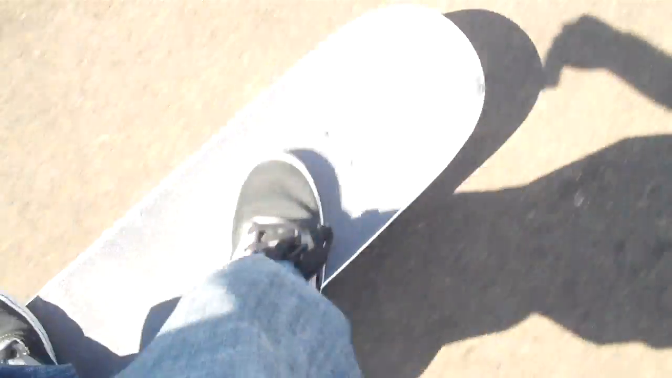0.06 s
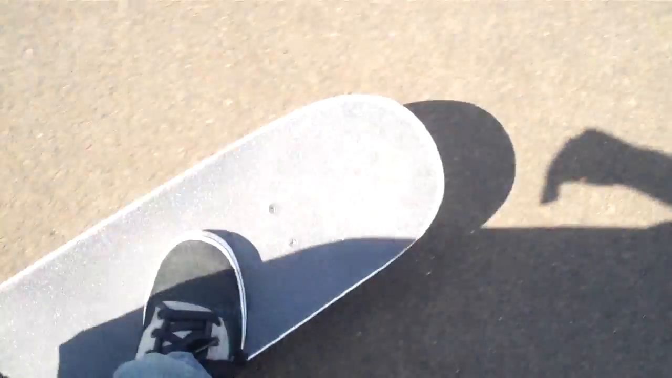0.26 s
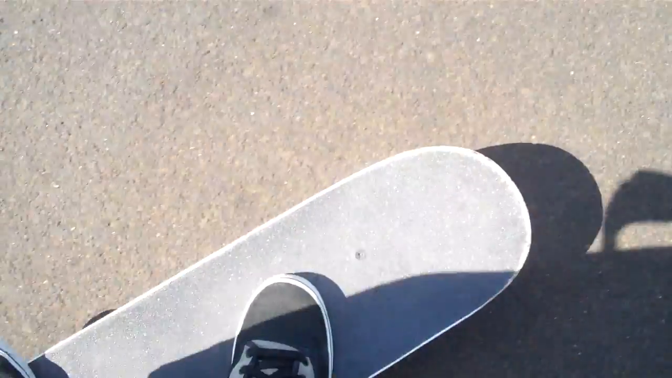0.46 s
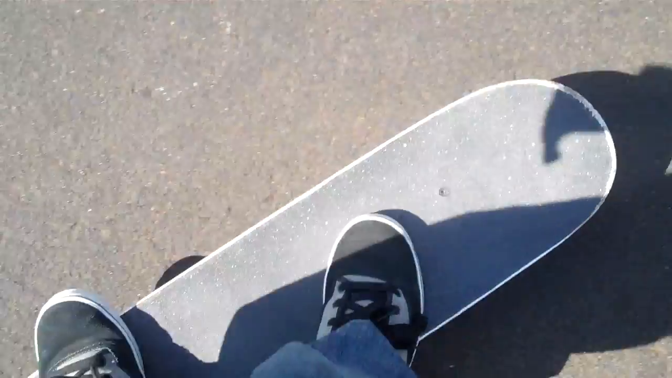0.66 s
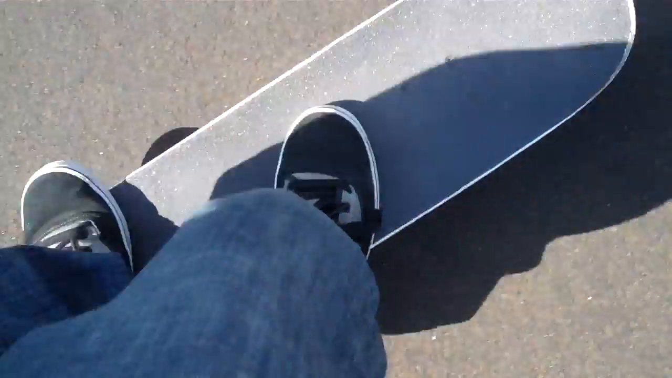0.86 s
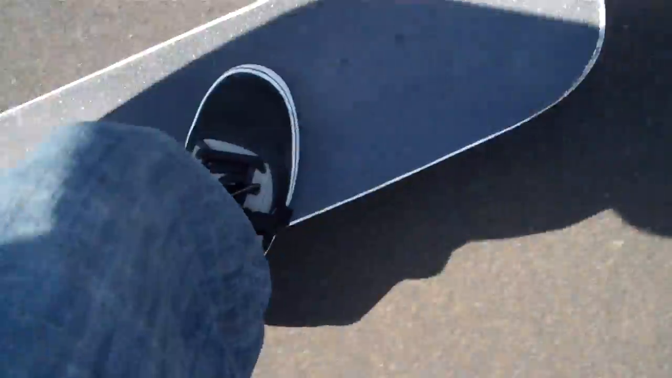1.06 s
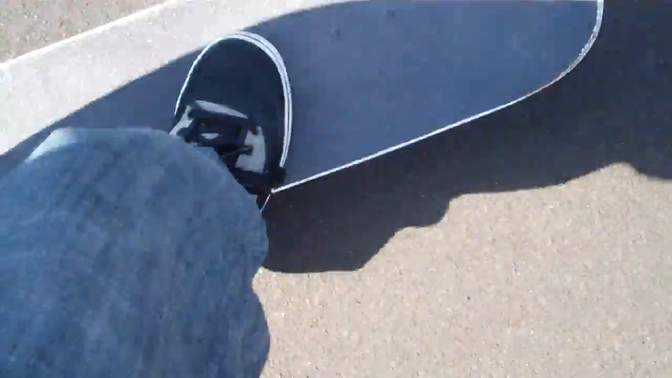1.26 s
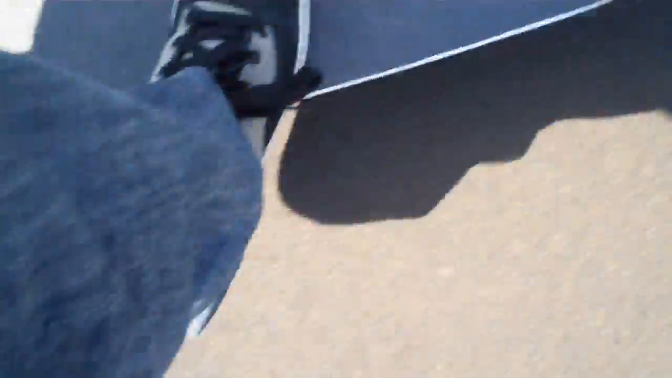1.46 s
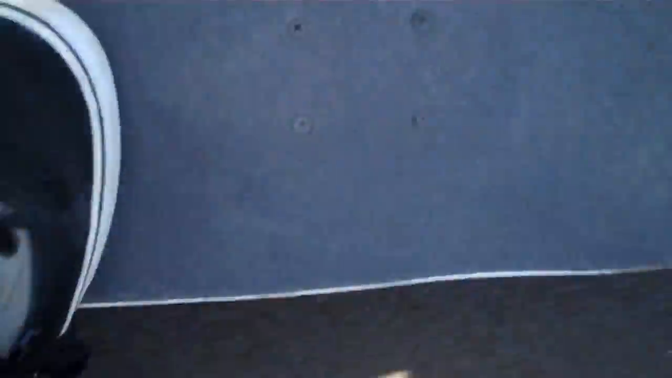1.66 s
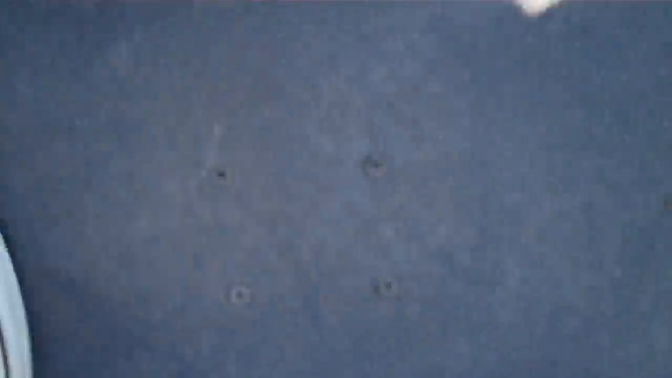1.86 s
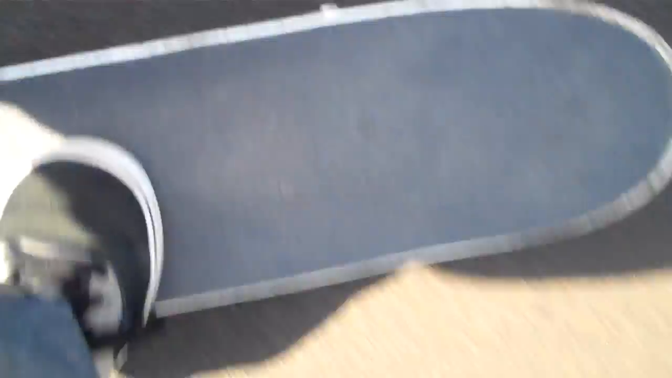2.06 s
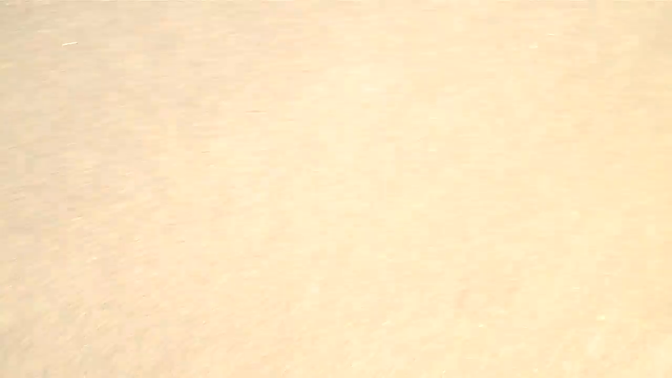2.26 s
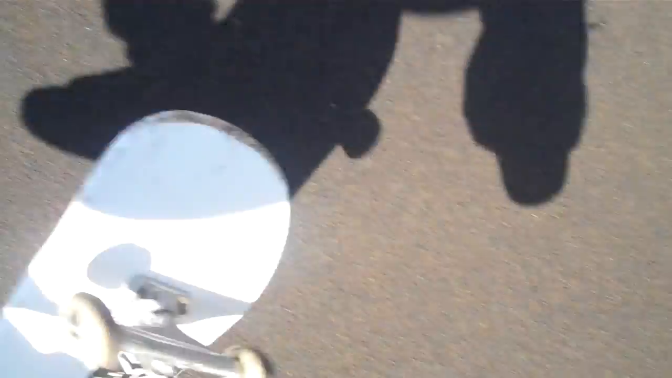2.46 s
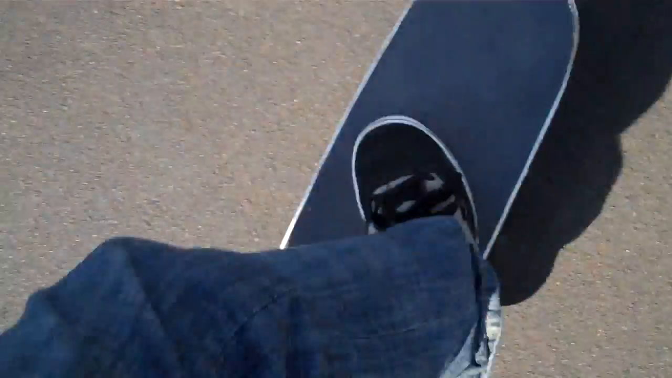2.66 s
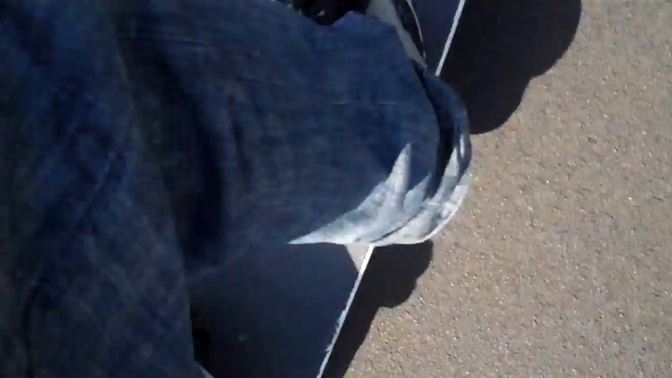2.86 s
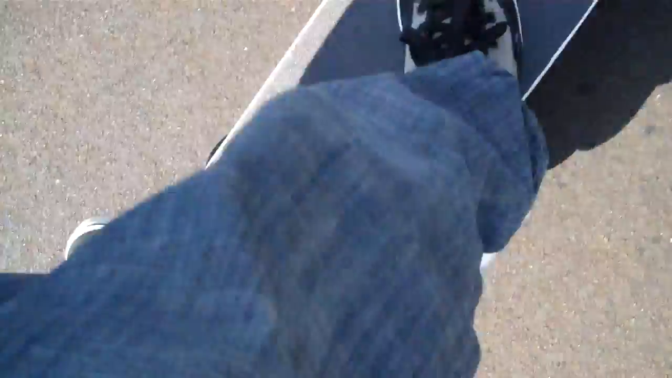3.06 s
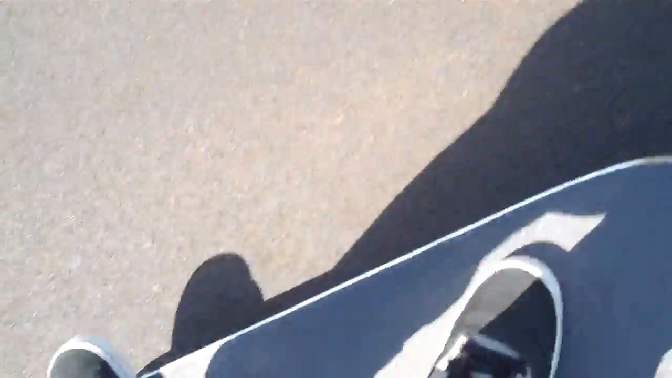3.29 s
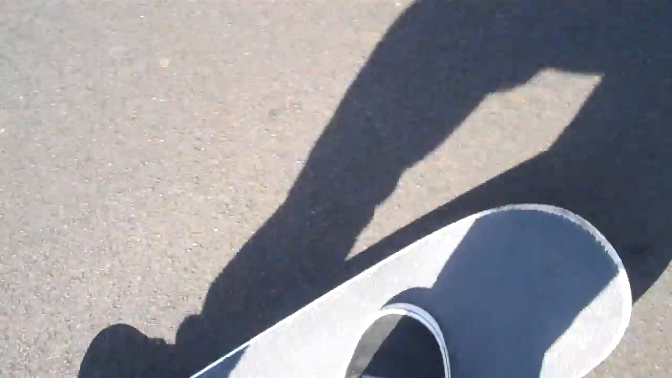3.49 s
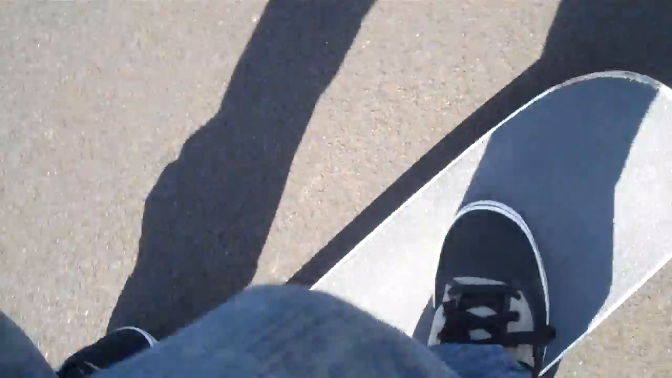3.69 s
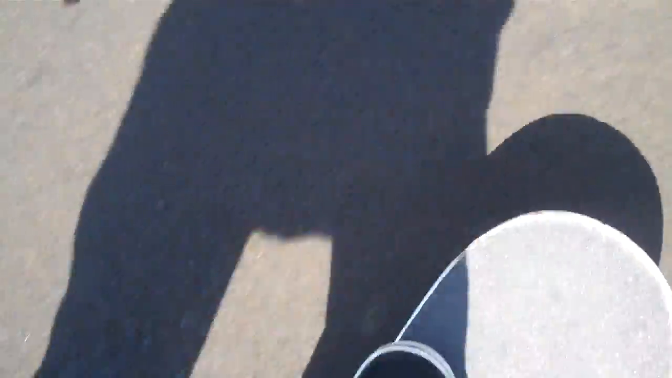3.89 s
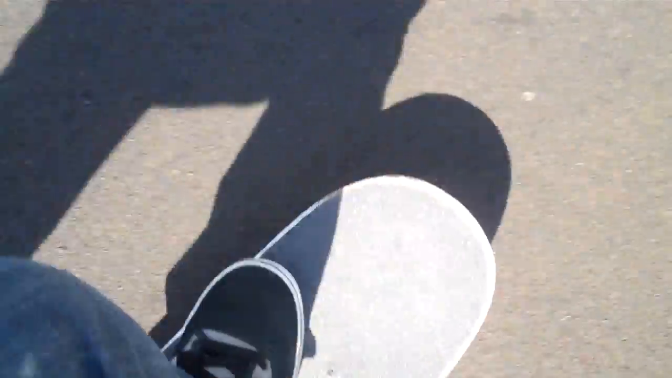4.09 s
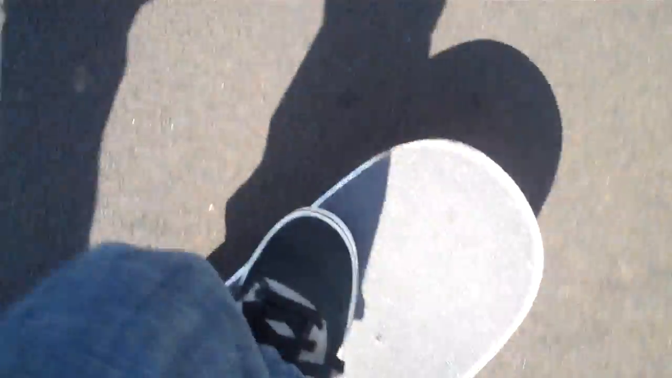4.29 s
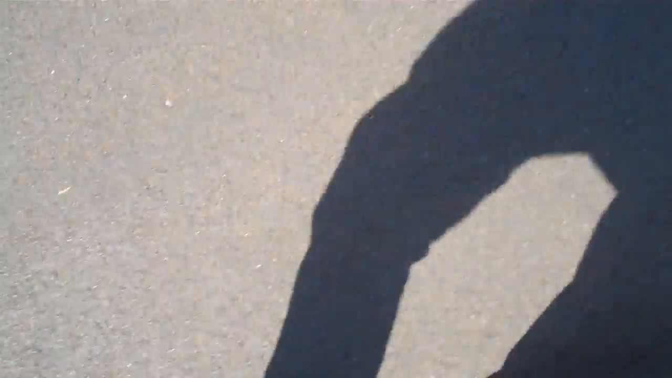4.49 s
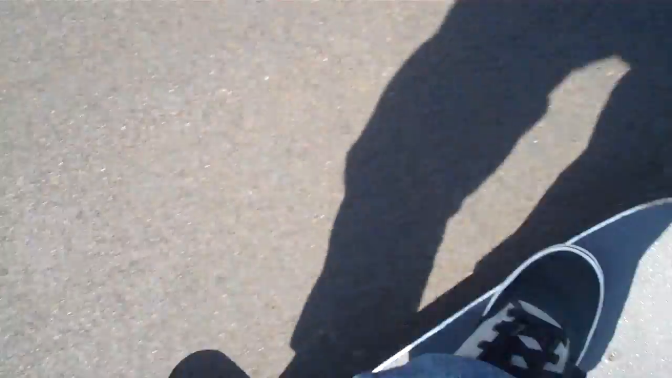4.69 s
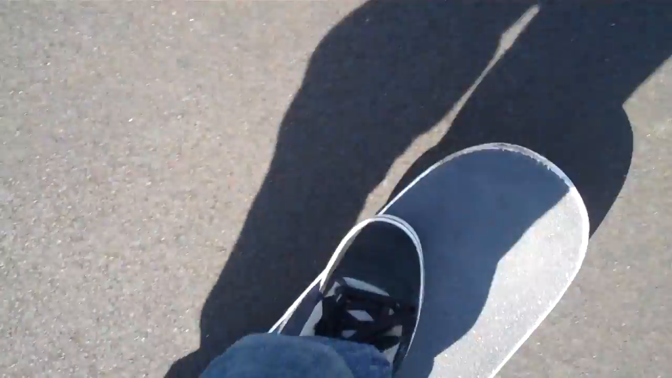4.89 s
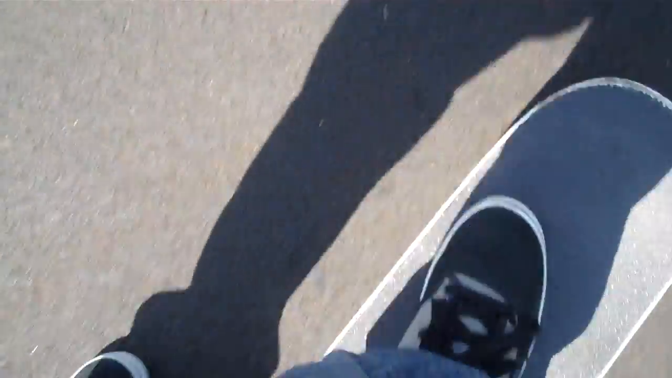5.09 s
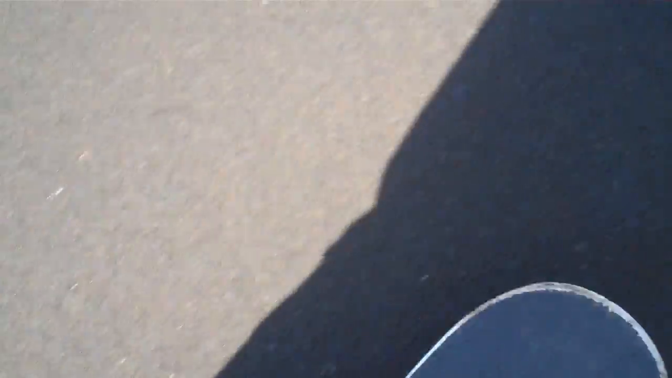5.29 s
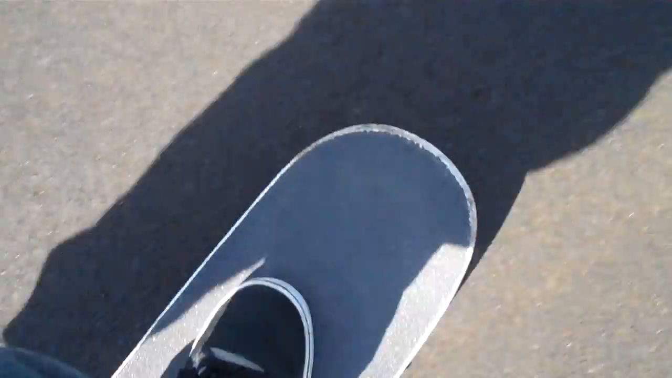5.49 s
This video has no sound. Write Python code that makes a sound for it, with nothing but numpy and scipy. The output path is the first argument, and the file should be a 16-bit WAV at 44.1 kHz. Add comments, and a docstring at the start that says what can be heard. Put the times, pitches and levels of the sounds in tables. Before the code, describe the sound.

A skateboard rumbles loudly over rough asphalt, pops into a jump, slams down with overloading wooden clacks, then rolls on with another sharp tap.

```python
"""A skateboard rolls over rough asphalt, heard in stereo from the rider's hand: stones jolt wheels and deck,
the trucks chatter, grit crunches and turning wheels rasp, as random impacts ringing resonant bodies.
A push-off thud, then the tail pops and a shoe drags over the grip tape, a burst of coloured noise.
In the air the wheels whir faintly; the board slams down, decaying deck modes that overload the microphone.
The front wheels tap down, the board rolls on, and after a turn they tap down again."""
import sys
import numpy as np
from scipy import signal
from scipy.fft import rfft, irfft, next_fast_len
from scipy.io import wavfile
from scipy.ndimage import uniform_filter1d, map_coordinates

SR = 44100
rng = np.random.default_rng(int(sys.argv[2]) if len(sys.argv) > 2 else 0)


def waveform_to_disk(signal):
    """Save audio, clipped to [-1, 1], as 16-bit WAV at the path in sys.argv[1]."""
    frames = np.transpose(np.atleast_2d(signal))
    scaled = np.clip(frames, -1, 1) * 32767
    samples = np.round(scaled).astype(np.int16)
    wavfile.write(sys.argv[1], SR, samples)


N = 244314
TIME = np.arange(N) / SR
TAPS = 4096  # length of a body's ring in samples
RING_TIME = np.arange(TAPS) / SR
LIFT_S, LAND_S, UNLOAD_S = 2.32, 2.77, 0.077  # rolling stops in between; time to unload the wheels

# Ring of the trucks. Each row: frequency in Hz, relative density in dB per Hz.
TRUCK_SPECTRUM = [(300, -23), (700, -1.5), (1000, 0.5), (1250, 6), (1480, -1), (1720, -3), (2020, -9),
                  (2200, -5), (2330, -0.5), (2520, -9), (2800, -23), (3030, -13.5), (3400, -15.5),
                  (7000, -52.5)]
# Crunch of grit. Each row: frequency in Hz, relative density in dB per Hz.
GRIT_SPECTRUM = [(800, -26), (2600, 7.5), (3400, 0), (4200, 1.5), (5100, -2.5), (6100, -6), (7500, -7),
                 (10300, -12.5), (11500, -16.5), (12600, -25), (13800, -84)]
# Loose grain against wheel and truck. Each row: frequency in Hz, relative density in dB per Hz.
PING_SPECTRUM = [(500, -9.5), (1500, 7.5), (2400, 6), (3000, 2), (4000, -3.5), (5200, -7), (7000, -19),
                 (11000, -19.5), (12600, -37), (14500, -57)]
# Rub of the grip tape, also the colour of the whir. Each row: frequency in Hz, relative density in dB per Hz.
GRIP_SPECTRUM = [(150, -15), (500, -10), (710, 5), (950, 0.5), (1600, 5), (2600, 1.5), (4700, 2),
                 (6500, -6), (9000, -16), (12000, -31), (14500, -43)]
# Wheels scrubbing sideways in a turn. Each row: start in seconds, end in seconds, deck groan in dB,
# frequency favoured by the groan in Hz, rasp in dB, centre of the rasp in Hz.
SCRUB_EVENTS = [(0.114, 0.22, -28, 690, -35, 2300), (0.778, 0.856, -23.5, 690, -28, 2280),
                (0.882, 0.921, -23, 690, -24.5, 2350), (1.12, 1.17, -28.5, 1200, -36, 2470),
                (1.458, 1.518, -20.5, 900, -29, 2400), (1.499, 1.583, -18.5, 900, -21.5, 2310),
                (1.876, 2.222, -39, 1200, -38.5, 2360), (3.807, 4.072, -30, 1150, -34, 2380),
                (4.657, 4.765, -24, 690, -29.5, 2100), (4.769, 4.87, -45, 690, -35.5, 2160),
                (5.014, 5.147, -29.5, 714, -37.5, 2410), (5.133, 5.305, -22.5, 770, -29.5, 2400),
                (5.312, 5.367, -23.5, 726, -27.5, 2420)]


def amp(db):
    """Level in dB to linear gain."""
    return 10 ** (np.asarray(db) / 20)


def evened(x):
    """Scales to rms 1."""
    return x / np.sqrt(np.mean(x ** 2) + 1e-20)


def read(points, hz):
    """Joins spectrum points on a log-frequency axis."""
    f, value = np.transpose(points)
    return np.interp(np.log(hz + 1), np.log(f + 1), value)


def add(mix, s, sound):
    """Adds a sound at s seconds, cut at the end of the mix."""
    part = mix[..., round(s * SR):][..., :sound.shape[-1]]
    part += sound[..., :part.shape[-1]]


def response(points):
    """Causal (minimum-phase) ring of a body with this spectrum, energy 1."""
    log_gain = np.log(amp(read(points, abs(np.fft.fftfreq(TAPS, 1 / SR)))))
    ring = np.fft.ifft(np.exp(np.conj(signal.hilbert(log_gain)))).real
    return ring / np.linalg.norm(ring)


def through(x, ring):
    """Excites a ring with x, keeping the length of x."""
    return signal.oaconvolve(x, ring)[:len(x)]


def ports(shared, apart):
    """Two microphone ports hear nearly the same bass but partly different treble."""
    # Each row: frequency in Hz, left-right likeness from 0 to 1.
    likeness = [(30, 0.96), (70, 1), (150, 0.98), (500, 0.99), (1200, 0.96), (2300, 0.9), (4000, 0.8),
                (8000, 0.27), (12000, 0.38)]
    size = next_fast_len(len(shared), True)
    same = np.clip(read(likeness, np.fft.rfftfreq(size, 1 / SR)), 0, 1)
    mid = rfft(shared, size)
    side = rfft(apart, size) * np.sqrt((1 - same) / (1 + same))
    return irfft(np.array([mid + side, mid - side]), size)[:, :len(shared)]


def noise(points):
    """Steady noise of a given colour, rms 1."""
    return evened(through(rng.standard_normal(N), response(points)))


def flutter(hz):
    """Random wander up to about the given rate, rms 1."""
    size = next_fast_len(N, True)
    f = np.fft.rfftfreq(size, 1 / SR)
    slow = rfft(rng.standard_normal(size)) / (1 + (f / hz) ** 4)
    return evened(irfft(slow, size)[:N])


def held(start, end, rise_s, fall_s):
    """Swells to 1 at the start, holds, and dies away after the end."""
    outside = np.maximum((start - TIME) / rise_s, (TIME - end) / fall_s)
    return np.exp(-np.clip(outside, 0, 10) ** 2)


def ride(axis):
    """Gain over time of the rumble (1) or the grit (2), silent while the board is in the air."""
    # Ride up to the jump. Each row: time in seconds, rumble in dB, grit in dB.
    run_up = [(0.0, -16, -42.5), (0.08, -21, -43), (0.16, -20, -38.5), (0.37, -21.5, -41.5),
              (0.44, -14, -38), (0.8, -14.5, -35), (0.9, -16, -33.5), (0.93, -23, -50),
              (1.02, -25.5, -50.5), (1.14, -13, -34), (1.3, -22.5, -36), (1.36, -19.5, -42.5),
              (1.44, -18.5, -36.5), (1.57, -19.5, -32.5), (1.62, -23.5, -37), (1.84, -23, -38),
              (1.96, -21.5, -35), (2.24, -18, -37.5), (2.34, -48, -52)]
    # Ride away from the landing. Each row: time in seconds, rumble in dB, grit in dB.
    run_out = [(2.81, -42, -52), (2.94, -42, -71), (2.98, -35.5, -48.5), (3.02, -40.5, -55),
               (3.16, -34.5, -47.5), (3.2, -48, -52), (3.23, -61, -75), (3.43, -44.5, -54),
               (3.47, -48.5, -76), (3.64, -38, -49.5), (3.69, -39, -53.5), (3.99, -21.5, -35.5),
               (4.23, -22.5, -41), (4.29, -19.5, -36), (4.38, -19.5, -40.5), (4.51, -13, -35.5),
               (4.74, -22.5, -37), (4.89, -29.5, -50.5), (4.93, -33, -56), (5.0, -31.5, -48.5),
               (5.02, -21.5, -44), (5.22, -23, -35), (5.54, -17.5, -43.5)]
    rows = np.array(list(run_up) + list(run_out))
    airborne = held(LIFT_S + UNLOAD_S, LAND_S - UNLOAD_S, UNLOAD_S, UNLOAD_S)
    return amp(np.interp(TIME, rows[:, 0], rows[:, axis])) * (1 - airborne)


def stones(per_s, spread_db, road, window_s=0.087):
    """Random impacts of uneven size, stronger on coarse patches; power evened over the window."""
    size = (rng.random(N) < per_s / SR) * amp(spread_db * np.minimum(rng.exponential(1, N), 4)) * road
    power = uniform_filter1d(size ** 2, max(int(window_s * SR), 100))
    size /= np.sqrt(abs(power) + 1e-12)
    return size * rng.choice([-1., 1.], (2, N))


def resonate(x, hz, width):
    """A fixed or moving resonance, two poles for steep skirts; rms 1."""
    turn = np.exp(2j * np.pi * np.cumsum(hz * np.ones(len(x))) / SR)
    r = np.exp(-np.pi * width / SR)
    shifted = signal.lfilter([1], [1, -2 * r, r ** 2], x / turn)
    return evened((turn * shifted).real)


def favoured(modes, spot_hz, favour_db=9, octaves=0.18):
    """The struck spot boosts the modes near its frequency."""
    return [(hz, db + favour_db * np.exp(-(np.log2(hz / spot_hz) / octaves) ** 2), last)
            for hz, db, last in modes]


def thump(t, modes, rise_s):
    """Soft urethane spreads a blow over a millisecond or more before the deck rings out; peak 1."""
    ring = sum(amp(db - 60 * t / t60) * np.sin(2 * np.pi * hz * t) for hz, db, t60 in modes)
    ring = ring * (1 - np.exp(-(t / rise_s) ** 2))
    return ring / abs(ring).max()


def crack(t, colour, t60, tail_db, tail_t60):
    """Hard contact crushes grit: a bright snap with a faint tail, a row for each port."""
    shape = amp(-60 * t / t60) + amp(tail_db - 60 * t / tail_t60)
    ring = response(colour)
    return ports(*[through(z * shape, ring) for z in rng.standard_normal((2, len(t)))]) / 2


def air(air_db=-49, breeze_db=-34, buffet_db=-4, windward_db=1):
    """Wind noise on the microphone, in puffs and a light breeze, over steady noise of the open street."""
    # Wind. Each row: frequency in Hz, relative density in dB per Hz.
    wind_spectrum = [(15, 6.5), (40, -2), (90, 1.5), (140, -7), (210, -0.5), (400, -9), (1200, -37),
                     (4000, -87)]
    # Outdoor background. Each row: frequency in Hz, relative density in dB per Hz.
    street_spectrum = [(15, 2), (50, 4.5), (200, 2), (600, -2), (1200, -2), (2000, -10.5), (4500, -17),
                       (7000, -24.5), (11000, -28), (13500, -70)]
    # Puffs pushed by the jump and landing. Each row: peak in seconds, level in dB, rise in seconds,
    # t60 in seconds.
    gusts = [(2.26, -31, 0.041, 0.12), (2.335, -25.5, 0.046, 0.25), (2.454, -37.5, 0.025, 0.92),
             (2.76, -20.5, 0.0056, 0.14)]
    shared, left, right = noise(wind_spectrum), noise(wind_spectrum), noise(wind_spectrum)
    eddies = shared / 2 + amp(buffet_db) * np.array([left, right])  # each port has its own eddies
    eddies = eddies * amp([[windward_db], [-windward_db]])
    puffs = sum(amp(db - 60 * np.maximum(TIME - s, 0) / t60) * held(s, TIME[-1], rise_s, rise_s)
                for s, db, rise_s, t60 in gusts)
    wind = puffs + amp(breeze_db) * np.sqrt(ride(axis=1)) / 2  # the ride brings its own breeze
    background = ports(noise(street_spectrum), noise(street_spectrum))
    return wind * eddies + amp(air_db) * background


def street(x, wet_db=-38, t60=0.74, dull_hz=6000):
    """Faint scatter from the open surroundings: decaying, dulled noise tails."""
    t = np.arange(SR // 2) / SR
    r = np.exp(-2 * np.pi * dull_hz / SR)
    tails = signal.lfilter([1 - r], [1, -r], rng.standard_normal((2, len(t)))) * amp(-60 * t / t60)
    return amp(wet_db) * ports(*[through(x.mean(0), tail / np.linalg.norm(tail)) for tail in tails])


def spinning(whir_db=-56.0):
    """In the air the wheels whir faintly on their bearings: steady coloured noise."""
    return amp(whir_db) * noise(GRIP_SPECTRUM) * held(LIFT_S, LAND_S, UNLOAD_S, UNLOAD_S)


def fizz(patch_db=6.0, before_db=-13, after_db=-24):
    """Fizzing top of the rolling noise, in short bursts, quieter after the landing as the microphone has
    turned."""
    # Each row: frequency in Hz, relative density in dB per Hz.
    fizz_spectrum = [(3000, -36), (6500, -6), (8500, -2), (10400, -0.5), (11500, -6.5), (12600, -20),
                     (13800, -65)]
    level = amp(np.where(TIME < LAND_S, before_db, after_db)) * ride(axis=2)
    hits = stones(per_s=2500, spread_db=5.0, road=amp(patch_db * flutter(hz=120)))
    return level * ports(*[through(h, response(fizz_spectrum)) for h in hits])


def pings(ping_db=-2):
    """Loose grains tick under the wheels, some tens a second."""
    hits = stones(per_s=70, spread_db=1.5, road=1, window_s=0.091) * ride(axis=2)
    return amp(ping_db) * ports(*[through(h, response(PING_SPECTRUM)) for h in hits])


def chips(truck_db=-3):
    """Hard chips click straight into a truck: a sharp tick with a short ring of the truck."""
    # Each row: time in seconds, peak level in dB.
    clicks = [(0.05, -16), (0.298, -23), (0.609, -7), (0.686, -11), (0.708, -9), (0.738, -10), (1.164, -11),
              (1.343, -20), (1.466, -13), (1.568, -11), (1.733, -9), (1.799, -9), (2.176, -14), (3.959, -9),
              (4.0205, -10), (4.306, -13), (4.386, -17), (4.465, -9), (4.616, -10), (4.974, -25),
              (5.028, -16), (5.172, -16), (5.199, -5), (5.26, -9), (5.533, -25)]
    tick = response(PING_SPECTRUM) + amp(truck_db) * response(TRUCK_SPECTRUM)
    out = np.zeros(N)
    for s, db in clicks:
        add(out, s, amp(db) * tick / abs(tick).max())
    return out


def hardware(hanger_db=5, race_db=-7, patch_db=3):
    """Stones ring the truck hangers, whose pitch follows the rider's weight, and tick in the bearings."""
    # Main resonance of the trucks. Each row: time in seconds, frequency in Hz.
    lean = [(0.2, 1270), (0.6, 1090), (1.2, 1290), (1.6, 1130), (2.2, 1130), (3.9, 1190), (4.4, 1100),
            (4.7, 1184), (5.4, 1110)]
    hanger_width_hz, race_hz, race_width_hz = 194, 4780, 1330  # widths of each pole
    road = amp(patch_db * flutter(hz=90))
    hanger_hz = np.interp(TIME, *np.transpose(lean))
    hanger = resonate(stones(per_s=500, spread_db=1.5, road=road)[0], hanger_hz, hanger_width_hz)
    race = resonate(stones(per_s=830, spread_db=2.0, road=road)[0], race_hz, race_width_hz)
    return ride(axis=2) * (amp(hanger_db) * hanger + amp(race_db) * race)


def rolling(rumble_db=-3.5, drone_db=-4, chatter_db=7.5, grit_db=-0.94,
            deck_patch_db=1.2, truck_patch_db=3.5, grit_patch_db=3.0):
    """One road surface shakes wheels and deck, rattles the trucks and crunches under the urethane."""
    # Deck. Each row: frequency in Hz, relative density in dB per Hz.
    deck_spectrum = [(30, -59), (90, -37.5), (135, -19), (190, -10.5), (290, -5.5), (385, -19), (520, -3),
                     (705, 1.5), (830, -2), (1010, -9), (1120, -6.5), (1290, -12.5), (1500, -20.5),
                     (2800, -48), (5000, -63)]
    # Wheels. Each row: frequency in Hz, relative density in dB per Hz.
    wheel_spectrum = [(30, -78), (100, -16), (190, -3), (320, 3), (385, 0), (450, 6), (550, 4.5),
                      (650, 4.5), (850, -17), (2000, -65)]
    # a turn takes load off the wheels' drone and shakes the trucks
    carve_ease_s, carve_drone_db, carve_chatter_db = 0.025, -7, 2.5
    # fine grit needs pressure: it grows faster than the chatter of the trucks
    grit_full_db, grit_growth = -36, 0.32
    road, rumble, coarse = flutter(hz=104), ride(axis=1), ride(axis=2)
    turns = [held(start, end, carve_ease_s, carve_ease_s / 2) for start, end, *_ in SCRUB_EVENTS]
    carve = np.max(turns, axis=0)
    deck_road, truck_road = amp(deck_patch_db * road), amp(truck_patch_db * road)
    deck = stones(per_s=2500, spread_db=2.0, road=deck_road) * rumble
    wheels = stones(per_s=3000, spread_db=1.6, road=deck_road) * rumble * amp(carve_drone_db * carve)
    trucks = stones(per_s=1800, spread_db=2.5, road=truck_road) * coarse * amp(carve_chatter_db * carve)
    grit = stones(per_s=3500, spread_db=3.0, road=amp(grit_patch_db * road))
    grit = grit * coarse * (coarse / amp(grit_full_db)) ** grit_growth
    out = np.zeros((2, N))
    for hits, body, db in [(deck, deck_spectrum, rumble_db), (wheels, wheel_spectrum, drone_db),
                           (trucks, TRUCK_SPECTRUM, chatter_db), (grit, GRIT_SPECTRUM, grit_db)]:
        ring = response(body)
        out += amp(db) * np.array([through(h, ring) for h in hits])
    return ports(*out)


def scrubs(slip_db=5, fade_s=0.0093):
    """Urethane sticks and slips over the asphalt: the wheel rasps and the deck groans."""
    # Deck under scrubbing wheels. Each row: frequency in Hz, relative level in dB, width of each pole in Hz.
    groan_modes = [(689.6, 3, 62), (888, 1, 47), (1185, -6.5, 76), (1745, -0.5, 360)]
    # both pitches waver with the load on the wheels
    rasp_width_hz, rasp_wander_hz, groan_wander_share = 330, 60, 0.018
    slips = stones(per_s=2500, spread_db=2.5, road=amp(slip_db * flutter(hz=68)))[0]
    wander, out = flutter(hz=24.4), np.zeros(N)
    for start, end, groan_db, groan_hz, rasp_db, rasp_hz in SCRUB_EVENTS:
        span = slice(round(start * SR), round(end * SR))
        drive, waver = slips[span], wander[span]
        groan = evened(sum(amp(db) * resonate(drive, hz * (1 + groan_wander_share * waver), width)
                           for hz, db, width in favoured(groan_modes, groan_hz, favour_db=5.5)))
        rasp = resonate(drive, rasp_hz + rasp_wander_hz * waver, rasp_width_hz)
        sound = amp(groan_db) * groan + amp(rasp_db) * rasp
        add(out, start, sound * signal.windows.tukey(len(drive), 2 * fade_s / (end - start)))
    return out


def bumps(knock_db=-3.5, crunch_db=1.2):
    """A wheel meets a larger stone or crack, knocks the deck and grinds; one pinched chip snaps."""
    # Each row: time in seconds, relative knock in dB, frequency favoured by the knock in Hz,
    # relative crunch in dB.
    large_stones = [(.002, -3, 686, -13), (.026, -4, 684, -40), (.0475, 0, 628, -20), (.085, -5, 716, -19),
                    (.124, -9, 695, -18), (0.268, -3.5, 624, -49), (0.388, -5.5, 760, -16),
                    (0.4208, -4, 490, -12.5), (.447, -6, 730, -13), (.497, -3.5, 690, -19),
                    (0.505, -16, 730, -13.5), (.5755, -4.5, 514, -12.5), (.608, 0.5, 560, -10),
                    (.654, -6, 537, -23), (.686, -29, 600, -16), (.6975, 3.5, 580, -15),
                    (.733, -23, 490, -15), (.738, -3, 690, -26), (.763, -2, 660, -23), (.789, 3, 694, -26),
                    (.881, -24, 1120, -22), (.897, -5.5, 690, -8), (.944, -7.5, 700, -20.5),
                    (.951, -18, 700, -15.5), (1.03, -12, 590, -41), (1.136, -2, 955, -13),
                    (1.144, -4.5, 490, -13.5), (1.215, -7, 483, -35), (1.290, -6, 1150, -24),
                    (1.305, -10.5, 497, -12.5), (1.314, -8, 1100, -19), (1.392, -10, 604, -37),
                    (1.433, -17, 604, -33), (1.504, -13, 745, -8), (1.559, -16, 860, -16),
                    (1.5675, -1, 850, -26), (1.590, -1, 840, -19), (1.720, -12, 600, -20),
                    (1.878, -9, 680, -19), (1.954, -5.5, 610, -13.5), (1.985, -8, 1140, -15),
                    (2.286, -18, 720, -23), (3.501, -28, 1060, -29.5), (3.559, -22.5, 1120, -30),
                    (3.646, -22, 754, -28), (3.814, -16, 770, -24), (3.862, -14, 706, -20),
                    (3.958, -3, 1110, -14), (3.977, -20, 860, -14), (4.008, -22, 1100, -14),
                    (4.0196, -6.5, 860, -15), (4.04, -11, 860, -15.5), (4.053, -29, 670, -15),
                    (4.184, -24, 700, -20), (4.243, -12, 700, -14), (4.286, -8, 714, -10),
                    (4.3055, -4, 1020, -15), (4.319, -5.5, 730, -21), (4.385, -10, 1100, -19),
                    (4.411, -9.5, 830, -30), (4.4495, 2, 660, -16), (4.5147, 5, 585, -28),
                    (4.540, -4.5, 780, -15.5), (4.600, 3.5, 640, -15), (4.986, -19, 700, -39),
                    (5.134, -12, 850, -26), (5.1445, -1, 690, -16), (5.172, -22, 660, -19),
                    (5.198, -7, 714, -17), (5.257, -12, 706, -20), (5.261, -4.5, 710, -27),
                    (5.285, -6, 875, -19), (5.326, -15, 720, -12.5), (5.356, -7, 810, -13),
                    (5.388, -24, 700, -14), (5.393, -4, 1160, -13), (5.460, -9.5, 750, -33)]
    # Low modes of the deck with the rider on it. Each row: frequency in Hz, relative level in dB,
    # t60 in seconds.
    knock_modes = [(490, -5, 0.026), (584, 0, 0.026), (685.5, 4.5, 0.025), (840, 4, 0.017),
                   (1156, -4, 0.028)]
    # Chip pinched out from under a wheel against the board: time in seconds, level in dB.
    pebble = (1.4093, -0.81)
    # Snap of that chip. Each row: frequency in Hz, relative density in dB per Hz.
    snap_spectrum = [(800, -30), (2100, -19), (2700, 1), (3300, 3), (4800, 1), (7000, -1), (10500, -11),
                     (12500, -29), (14500, -27)]
    t, out = RING_TIME, np.zeros((2, N))
    for s, low_db, spot_hz, high_db in large_stones:
        knock = thump(t, favoured(knock_modes, spot_hz), rise_s=0.0018)
        crunch = crack(t, PING_SPECTRUM, t60=0.012, tail_db=-14, tail_t60=0.084)
        add(out, s, amp(low_db + knock_db) * knock + amp(high_db + crunch_db) * crunch)
    snap = crack(t, snap_spectrum, t60=0.0056, tail_db=-31, tail_t60=0.027)
    add(out, pebble[0], amp(pebble[1]) * snap)
    return out


def stomp():
    """A dull thud as the rider pushes off for the jump."""
    # Loaded board. Each row: frequency in Hz, relative level in dB, t60 in seconds.
    loaded_modes = [(88.5, -3, 0.049), (150, -6, 0.062)]
    stomp_s, stomp_db = 2.2505, -17
    out = np.zeros(N)
    add(out, stomp_s, amp(stomp_db) * thump(RING_TIME, loaded_modes, rise_s=0.003))
    return out


def shoe(catch_db=3.0):
    """The sole catches unevenly on the grip tape, hisses as it speeds up the deck, and slips off its edge."""
    # Sole's hiss. Each row: frequency in Hz, relative density in dB per Hz.
    hiss_spectrum = [(4000, -32), (7500, -1), (9500, 0), (11500, -4), (13000, -13), (14500, -40)]
    start_s, end_s, bite_s, release_s, drag_db = 2.368, 2.459, 0.029, 0.0037, -31
    hiss_start_db, hiss_rise_db_per_s = -18.5, 114  # relative to the rub
    stroke = amp(drag_db) * held(start_s, end_s, bite_s, release_s)
    hiss = amp(hiss_start_db + hiss_rise_db_per_s * (np.clip(TIME, start_s, end_s) - start_s))
    rub = noise(GRIP_SPECTRUM) + hiss * noise(hiss_spectrum)
    return stroke * amp(catch_db * flutter(hz=196)) * rub


def clacks(ring_db=-16.0, favour_db=12, favour_octaves=0.14, rattle_db=-7.0, rattle_t60=0.095,
           contact_s=0.00023):
    """Each blow rings the deck, sets the hardware rattling and, with the rider on top, thumps."""
    # Blows in order: tail pop and rebounds, first touch, one truck, full weight, two front-wheel taps.
    # Each row: time in seconds, ring in dB, frequency of the favoured modes in Hz, ring time as a factor,
    # thump of the rider's weight in dB, frequency favoured by the thump in Hz, crack in dB,
    # pitch as a factor, pitch glide as the deck flexes as a share,
    # frequency above which the contact is too soft to ring the modes in Hz.
    blows = [(2.396, 5.5, 1110, 0.67, -5.5, 500, -30, 0.99, -0.028, 3600),
             (2.3990, -3.5, 2250, 1.14, -13, 700, -12.5, 1.02, 0.017, 3300),
             (2.421, -13.5, 2300, 0.69, -21, 694, -30, 0.94, -0.072, 3000),
             (2.6962, -9, 694, 0.77, -23, 604, -23, 1.22, -0.0073, 4000),
             (2.6983, 2.5, 2060, 0.25, -1.5, 700, -17, 0.99, -0.037, 3500),
             (2.7199, -3, 686, 1, 11, 700, -4, 0.9, 0.363, 4500),
             (2.731, -14, 950, 0.61, -8, 900, -24, 1, 0.015, 4000),
             (2.739, -15, 900, 0.66, -16, 900, -18, 1.1, 0.02, 4500),
             (2.7552, 7, 1110, 0.31, 9.5, 654, -5, 0.92, -0.078, 4500),
             (2.7605, 12, 1130, 0.46, 6.5, 640, -3, 0.98, -0.133, 4000),
             (2.7702, -12, 1130, 0.7, 4, 483, -32, 1.02, 0.0084, 3500),
             (3.2884, -2, 630, 0.56, -14.5, 642, -16, 0.98, -0.016, 5000),
             (3.338, -31, 2350, 0.62, -36, 700, -44, 1, 0, 3000),
             (3.3627, -11.5, 1130, 0.73, -21, 560, -25.5, 1.08, -0.064, 2900),
             (3.3697, -17.5, 1130, 0.57, -15.5, 308, -29, 1.07, 0.049, 3000),
             (4.867, 1.5, 2215, 0.32, -6, 618, -13, 0.96, 0.05, 2670),
             (4.8735, -18, 1600, 0.92, -19, 700, -26, 1, -0.011, 2700),
             (4.9014, -16.5, 710, 0.59, -7, 654, -24, 1.05, -0.09, 3000)]
    # Maple deck and trucks. Each row: nominal frequency in Hz, relative level in dB, nominal t60 in seconds.
    deck_modes = [(292, -13.5, 0.1), (500, -10, 0.047), (584, -1, 0.032), (693, 2.5, 0.08), (896, -6, 0.05),
                  (1117, -1.5, 0.052), (1270, -4, 0.086), (1510, -1, 0.076), (1610, -5.5, 0.048),
                  (1767, 8.5, 0.026), (2045, -2.5, 0.076), (2330, 1.5, 0.045), (2670, -4, 0.062),
                  (2900, 1.5, 0.027), (3340, -6.5, 0.082), (4680, -25, 0.021)]
    # Low modes under a full landing. Each row: nominal frequency in Hz, relative level in dB,
    # nominal t60 in seconds.
    slam_modes = [(277, -3, 0.046), (408, -11, 0.04), (478, 4.5, 0.029), (569, 8, 0.026), (691, 9, 0.024),
                  (878, -5, 0.047)]
    flex_s, contact_slope = 0.0332, 17  # time to flex under a blow; how steeply soft contact spares high modes
    feet_down_s, feet_damp_db, feet_damp_s = 2.7765, -6, 0.0036  # the soles choke the ring
    t, out = RING_TIME, np.zeros((2, N))
    hz, mode_db, t60 = np.transpose(deck_modes)[:, :, None]
    sign = np.cos(np.pi * np.arange(len(deck_modes)))[:, None]  # neighbouring modes start in opposite directions
    for s, db, spot_hz, length, weight_db, weight_hz, crack_db, pitch, glide, soft_hz in blows:
        flexed = np.cumsum(pitch + glide * (1 - np.exp(-t / flex_s))) / SR  # time warped by the pitch
        spot_db = favour_db * np.exp(-(np.log2(hz / spot_hz) / favour_octaves) ** 2)
        decay = amp(mode_db + spot_db - 60 * t / (t60 * length))
        modes = sign * decay * np.sin(2 * np.pi * hz * flexed) / (1 + (hz / soft_hz) ** contact_slope)
        shake = rng.standard_normal(TAPS) * amp(rattle_db - 60 * t / (rattle_t60 * length))
        rattle = through(shake, response(TRUCK_SPECTRUM)) / 2
        wood = amp(db) * (amp(ring_db) * modes.sum(0) + rattle) * (1 - np.exp(-t / contact_s))
        weight = amp(weight_db) * thump(flexed, favoured(slam_modes, weight_hz), rise_s=0.0011)
        snap = amp(crack_db) * crack(t, GRIT_SPECTRUM, t60=0.016, tail_db=-10.0, tail_t60=0.082)
        add(out, s, wood + weight + snap)
    feet = held(feet_down_s + feet_damp_s, feet_down_s + TAPS / SR, feet_damp_s, feet_damp_s)
    return out * amp(feet_damp_db * feet)


def bearing(board):
    """The microphone swings aside during the jump: sound reaches the right port slightly late."""
    swing_s, swing_width_s, swing_lead_s = 2.425, 0.23, .000082
    swing = held(swing_s, swing_s, swing_width_s, swing_width_s)
    late = np.arange(N) - swing_lead_s * SR * swing
    return np.array([board[0], map_coordinates(board[1], [late], order=3)])


def scene(left_db=0.93):
    """Board, shoe and air, weighted a little to the left."""
    ground = fizz() + pings() + chips() + hardware() + rolling() + scrubs() + bumps()
    board = bearing(ground + spinning() + stomp() + shoe() + clacks())
    return (board + street(board) + air()) * amp([[left_db], [-left_db]])


def record(dry):
    """The hardest blows flatten against full scale; then a low-pass limits the band."""
    edge_hz = 15000
    clipped = np.clip(dry, -1, 1)
    lowpass = signal.firwin(255, edge_hz, window=("kaiser", 8), fs=SR)
    return signal.oaconvolve(clipped, lowpass[None], "same")


dry = scene()
out = record(dry)
waveform_to_disk(out)
```